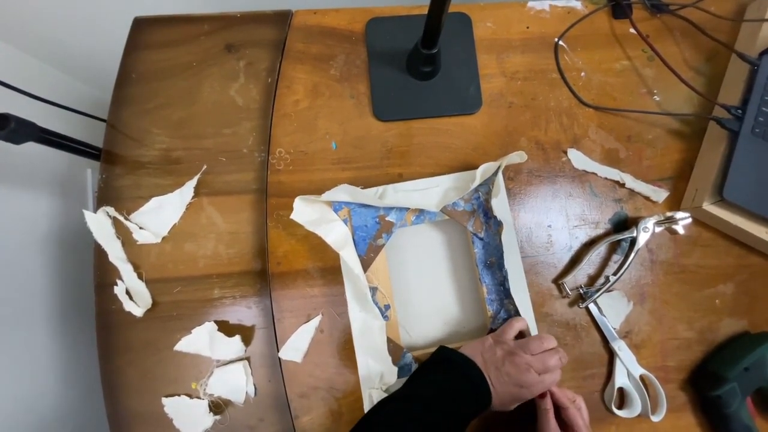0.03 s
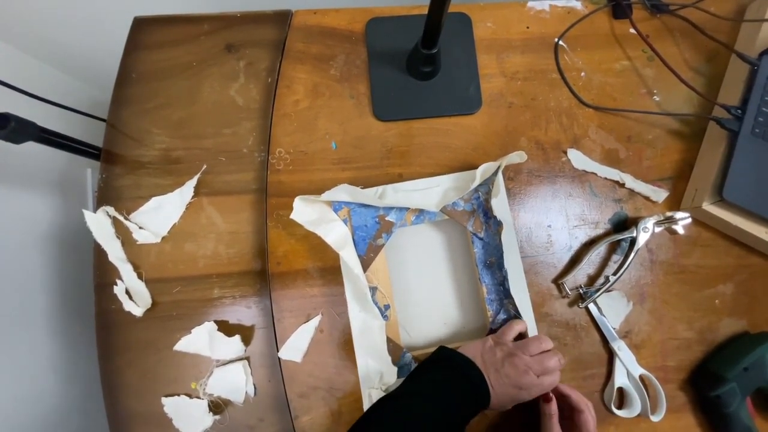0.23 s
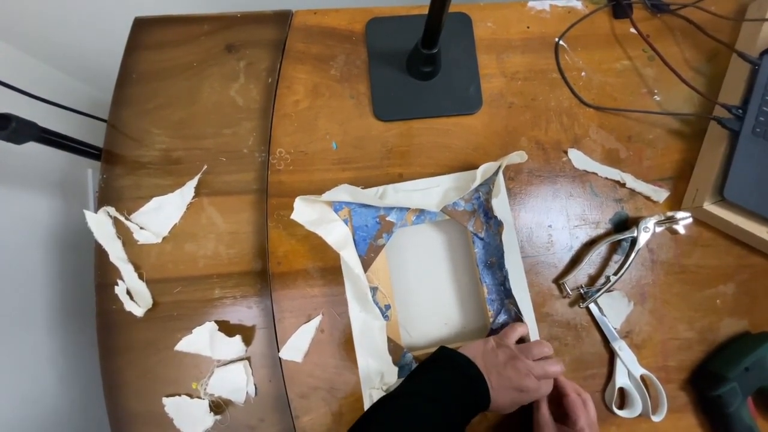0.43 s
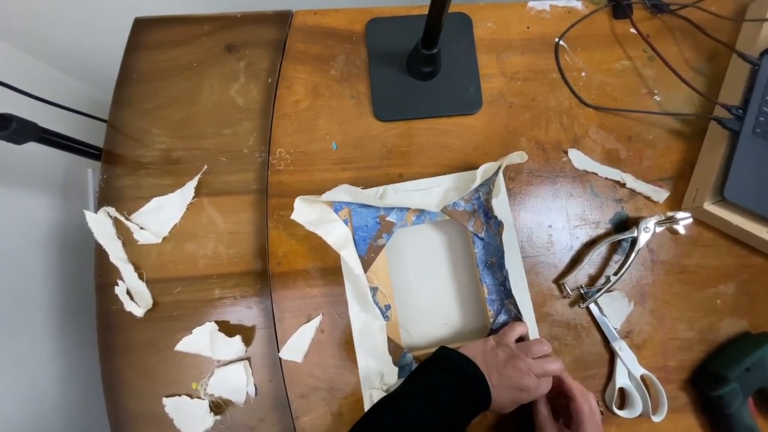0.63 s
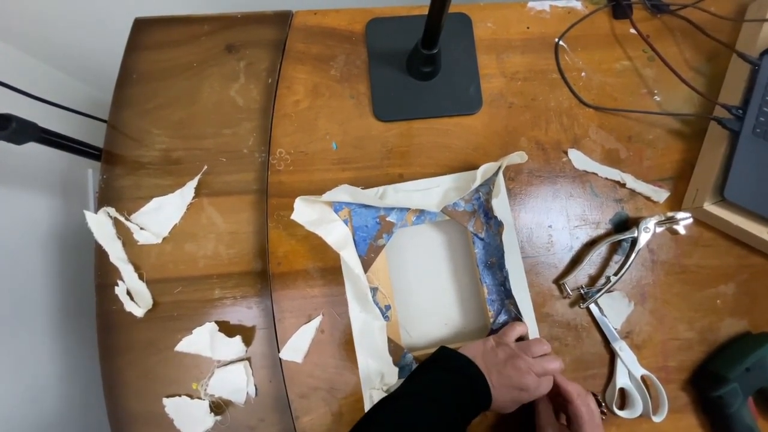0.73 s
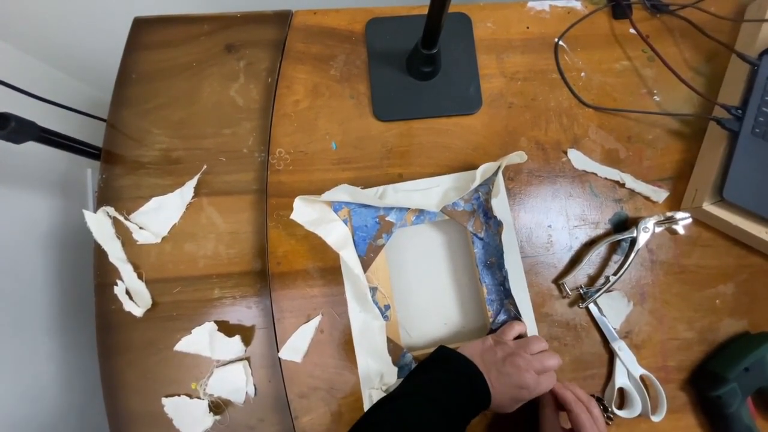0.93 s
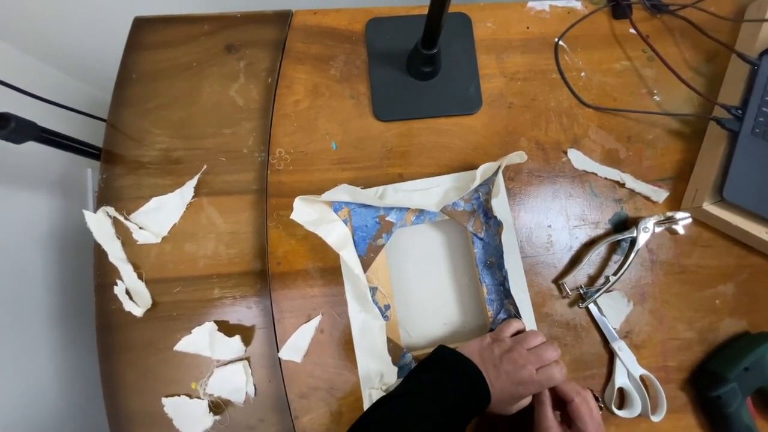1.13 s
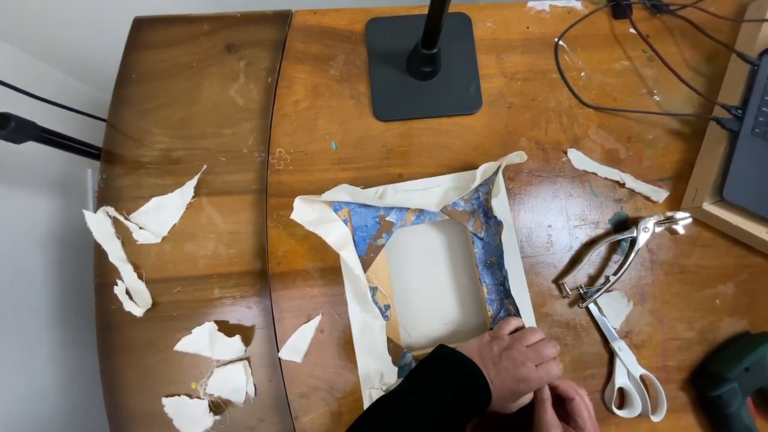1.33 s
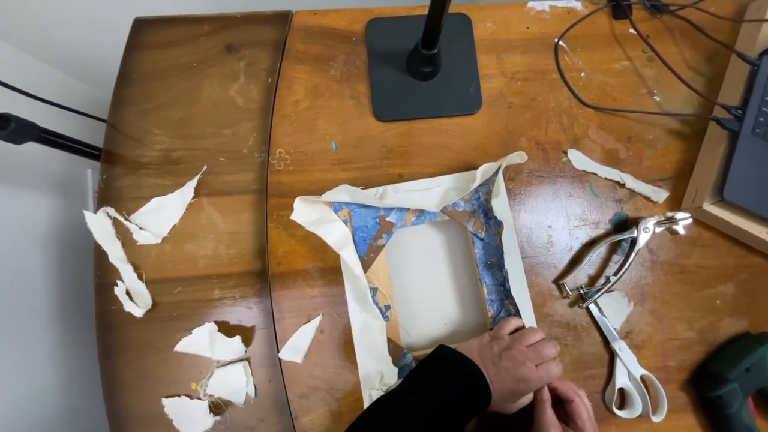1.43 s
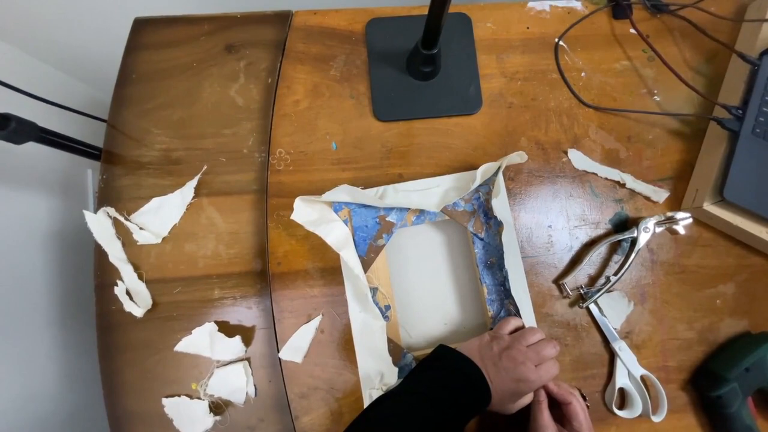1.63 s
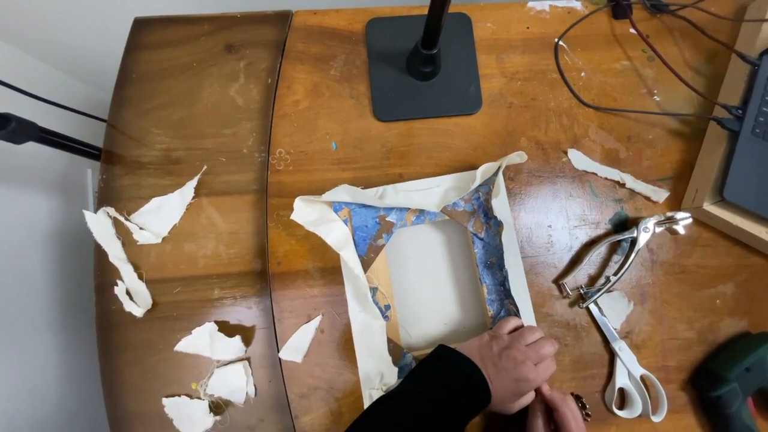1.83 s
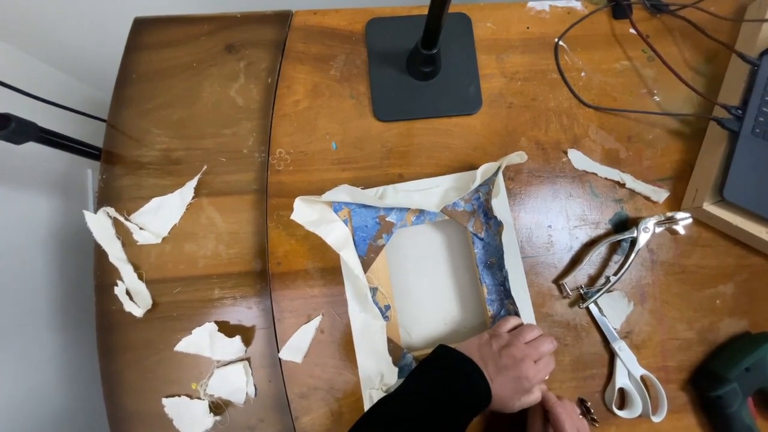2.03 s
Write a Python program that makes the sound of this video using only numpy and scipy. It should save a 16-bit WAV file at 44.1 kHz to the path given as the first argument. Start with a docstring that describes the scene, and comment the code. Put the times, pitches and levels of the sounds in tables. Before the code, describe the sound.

In a quiet room, a tool clacks twice and rattles, then a wooden frame knocks and rocks on a booming tabletop. Faint rasping strokes over canvas and a few dull thuds follow.

```python
"""Two hard clacks, a wooden clatter with a low boom, then soft strokes on cloth in a quiet room.
Hands are working canvas round a small wooden frame. A hard tool clacks and rattles; the frame
drops back and rocks, ringing at each knock, and the wooden table top booms under it.
Fingers rub over the weave in short strokes and nudge the frame with muffled thuds."""
import sys
import numpy as np
from scipy import signal
from scipy.fft import rfft, irfft, next_fast_len
from scipy.io import wavfile
from scipy.ndimage import map_coordinates

SR = 44100
rng = np.random.default_rng(int(sys.argv[2]) if len(sys.argv) > 2 else 0)


def unload_wav(signal):
    """Save mono or channel-first audio to the path in sys.argv[1] as 16-bit WAV at rate SR, clipped to [-1, 1]."""
    wavfile.write(
        sys.argv[1],
        SR,
        np.round(np.clip(np.atleast_2d(signal).T, -1, 1) * 32767).astype(np.int16),
    )


N = 92610  # 2.1 s
# A "fade" is the time a sound takes to drop by 60 dB; "softness" is the time it takes to build up.


def tool():
    """A hard tool clacks twice and rattles; each hit has a body and a bright crack."""
    # hits (time [s], body [dB], crack [dB], crack's treble limit [Hz])
    hits = [(0.2269, -17, -24, 6100), (0.2624, -27, -40, 6000), (0.2715, -25, -22.5, 8950),
            (0.302, -26.5, -53, 6000), (0.3181, -32, -55.5, 6000)]
    # tone of the body (frequency [Hz], level [dB])
    body_tone = [(50, -27.5), (120, -7), (190, -7.5), (270, -3.5), (350, -7), (580, -4), (720, -14),
                 (880, 1), (1050, -6.5), (1270, -3), (1550, -10.5), (2200, -31.5), (4000, -61.5)]
    # tone of the crack (frequency [Hz], level [dB])
    crack_tone = [(900, -9), (2200, -2), (3400, 4), (4000, -1.5), (4700, 1), (6400, -6.5), (7400, -21),
                  (9000, -19), (11000, -31.5), (15000, -43.5)]
    # faint notes that linger in the table or room after a clack (frequency [Hz], level [dB], fade [s])
    lingering = [(646, -12.5, 0.62), (901, -12, 0.87), (957, -5, 0.24), (1175, -13, .3), (1220, 0, 0.58),
                 (1382, -11.5, 0.98), (1396, -10, 0.69)]
    linger_db, body_room_db, crack_room_db = -19, 18.5, 15.5
    out = np.zeros((2, N))
    low, high = click(body_tone), click(crack_tone)
    for s, body_db, crack_db, limit_hz in hits:
        bright = signal.sosfilt(signal.butter(4, limit_hz, fs=SR, output="sos"), high)
        body = amp(body_db) * burst(low, fade_s=.043, soft_s=.0003)
        crack = amp(crack_db) * burst(bright, fade_s=.022, soft_s=.0007)
        add(out, s, body + crack)
        add(out, s, amp(body_db + linger_db) * ring(lingering, soft_s=.004))
        into_room = amp(body_db + body_room_db) * low + amp(crack_db + crack_room_db) * bright
        add(out, s, room(into_room[None]))
    return out


def frame():
    """The wooden frame knocks, ticks and rings on the table; where it lands colours each knock."""
    # knocks (time [s], wood [dB], ring [dB], tick [dB], softness [s], pitch [Hz])
    knocks = [(.435, -30, -38.5, -42.5, 0.00067, 900), (0.441, -18.5, -30.5, -35.5, 0.0015, 343),
              (.448, -27, -43, -54.5, 0.0012, 324), (.472, -19, -27, -52, 0.0013, 1034),
              (.485, -24, -43, -35.5, 0.0047, 283), (.507, -21.5, -29, -64, 0.00099, 630),
              (0.543, -29.5, -47, -69, 0.0011, 645)]
    # notes the frame rings at (frequency [Hz], level [dB], fade [s])
    notes = [(298.5, -3, .3), (319.7, -8.5, .3), (418.3, -12.5, 0.38), (478, -11, 0.3), (572.8, 2, 0.2),
             (649, -11, 0.19), (686, 2.5, 0.084), (747, -4.5, 0.2), (970, -21, 0.28), (1170, -12.5, 0.14)]
    # tone of knocked wood (frequency [Hz], level [dB])
    wood_tone = [(25, -36.5), (70, -23.5), (150, 11.5), (230, 0.5), (400, 10.5), (700, -0.5), (1000, -2),
                 (1280, -5.5), (1600, -8), (2200, -28.5), (4000, -25.5), (9000, -39.5)]
    # tone of the sharp tick (frequency [Hz], level [dB])
    tick_tone = [(100, -36.5), (600, 14), (1600, -13.5), (2200, 7.5), (3500, -2.5), (6000, -3), (8800, -6),
                 (10000, -22), (15000, -31.5)]
    # colour from the landing spot (frequency [times the pitch], level [dB])
    spot_tone = [(.35, -15), (.7, 0), (1, -1.5), (1.3, -3.5), (2, -9)]
    knock_room_db, tick_room_db = -11.5, -7
    out = np.zeros((2, N))
    tick_click = click(tick_tone)
    hz = np.geomspace(25, SR / 2, 100)
    for s, wood_db, ring_db, tick_db, soft_s, pitch_hz in knocks:
        tone_db = along(wood_tone, hz) + along(tuned(spot_tone, pitch_hz), hz)
        wood_click = click(np.column_stack([hz, tone_db]))
        knock = amp(wood_db) * burst(wood_click, fade_s=.045, soft_s=soft_s)
        tick = amp(tick_db) * burst(tick_click, fade_s=.044, soft_s=soft_s)
        add(out, s, knock + tick)
        add(out, s, room(amp(knock_room_db) * knock + amp(tick_room_db) * tick))
        add(out, s, amp(ring_db) * ring(notes, soft_s))
    return out


def table():
    """Each shove makes the table top sway deeply and boom like a drum."""
    # shoves (time [s], sway [dB], drum [dB])
    shoves = [(.003, -46, -46.5), (0.136, -74.5, -54.5), (0.174, -48, -56.5), (.215, -57.5, -37),
              (0.26, -50.5, -29.5), (0.4424, -28, -19.5), (0.4918, -27, -25.5), (0.598, -48, -33.5),
              (0.828, -49.5, -35), (.882, -58, -38.5), (.935, -57.5, -40.5), (1.211, -54.5, -50.5),
              (1.258, -65.5, -48.5), (1.402, -53.5, -54.5), (1.445, -44.5, -37), (1.558, -67, -49.5),
              (1.621, -64.5, -46.5), (1.837, -78.5, -44.5), (2.029, -43, -31)]
    # notes of the sway (frequency [Hz], level [dB], fade [s])
    sway_notes = [(58.4, 7.5, 0.2), (78.4, -8, 0.46)]
    # notes of the drumming (frequency [Hz], level [dB], fade [s])
    drum_notes = [(95, -4, 0.18), (125.16, 0, .36)]
    low_cut_hz = 44.3
    sway, drum = ring(sway_notes, soft_s=.005), ring(drum_notes, soft_s=.0018)
    out = np.zeros(N)
    for s, sway_db, drum_db in shoves:
        add(out, s, amp(sway_db) * sway + amp(drum_db) * drum)
    return signal.sosfilt(signal.butter(4, low_cut_hz, "high", fs=SR, output="sos"), out)


def fingers():
    """Fingers bump the cloth-covered frame: muffled thuds, each with a brief note."""
    # bumps (time [s], level [dB], softness [s], pitch [Hz])
    bumps = [(.003, -32.5, 0.0015, 192), (.007, -36, 0.001, 490), (0.049, -46.5, 0.0036, 462),
             (0.171, -35, 0.0033, 200), (.176, -40, 0.0042, 440), (.884, -59.5, 0.004, 370),
             (1.438, -47, 0.0026, 326), (1.574, -41.5, 0.0015, 423), (1.577, -42.5, 0.0033, 196),
             (1.623, -48.5, 0.00079, 219), (1.827, -57, 0.0027, 274), (1.851, -43, 0.0018, 467),
             (2.027, -43.5, .002, 219), (2.028, -46.5, 0.0038, 725), (2.070, -40, 0.0028, 221),
             (2.075, -59, .004, 790)]
    # tone of a thud (frequency [times the pitch], level [dB])
    thud_tone = [(.06, -39), (.25, -17.5), (.55, -10.5), (.85, 1), (1, 1), (1.2, -6), (1.7, -11),
                 (2.6, -24.5), (5, -33.5), (15, -59), (30, -84)]
    note_db, note_fade_s, room_db = 2, .06, -3.5
    out = np.zeros((2, N))
    for s, db, soft_s, pitch_hz in bumps:
        thud = amp(db) * burst(click(tuned(thud_tone, pitch_hz)), fade_s=.045, soft_s=soft_s)
        add(out, s, thud)
        add(out, s, amp(db) * ring([(pitch_hz, note_db, note_fade_s)], soft_s))
        add(out, s, amp(room_db) * room(thud))
    return out


def cloth():
    """Strokes over the canvas swell and die away, grainy and rasping from the weave."""
    # strokes (peak time [s], 20 dB rise [s], 20 dB fall [s],
    # drag [dB], rub [dB], rasp [dB], hiss [dB], rub pitch [Hz])
    strokes = [(.015, 0.15, 0.1, -45, -59.5, -63.5, -55, 1620),
               (.18, .12, .13, -46.5, -56, -64.5, -58.5, 1490),
               (0.786, 0.06, 0.082, -56, -59, -70, -108, 900),
               (0.869, 0.13, .16, -52, -56, -63, -63.5, 1590),
               (1.249, 0.11, 0.06, -63, -82, -73, -84, 1500),
               (1.566, .13, .10, -52.5, -56, -71, -71.5, 1620),
               (1.853, 0.077, 0.065, -51, -64, -60.5, -68, 1470),
               (1.895, 0.051, 0.048, -71, -65.5, -60, -60.5, 2440)]
    # tone of the low drag (frequency [Hz], level [dB])
    drag_tone = [(25, -35), (90, -13), (190, 2.5), (300, -4), (460, 0.5), (700, -11.5), (1100, -20.5),
                 (2000, -39), (5000, -78.5)]
    # tone of the rub (frequency [times the pitch], level [dB])
    rub_tone = [(.08, -51), (.3, -25), (.62, -6.5), (.82, 3), (1, 6), (1.2, -1), (1.5, -9.5), (2, -12.5),
                (2.65, -10), (3.2, -30), (5, -36), (8, -76)]
    # tone of the weave's rasp (frequency [Hz], level [dB])
    rasp_tone = [(600, -64.5), (1100, -31), (1330, -21.5), (1395, 2.5), (1470, -1.5), (1620, -2.5),
                 (1800, -27.5), (2250, -12), (2500, 0), (2660, -7), (2810, 1), (2960, -24.5), (3600, -26.5),
                 (7000, -71)]
    # tone of the high hiss (frequency [Hz], level [dB])
    hiss_tone = [(300, -49.5), (1500, -16), (3000, 4), (4700, 0), (6500, -0.5), (8700, -1.5), (9500, 0),
                 (10200, -38), (12000, -50)]
    grain_hz, grain_db = 346, .5  # a slight, fast flicker in loudness
    t, out = np.arange(N) / SR, np.zeros((2, N))
    flicker = map_coordinates(rng.standard_normal(N // 8), [t * grain_hz])
    drag, rasp, hiss = noise(drag_tone), noise(rasp_tone), noise(hiss_tone)
    for s, rise, fall, drag_db, rub_db, rasp_db, hiss_db, pitch_hz in strokes:
        from_peak = np.maximum((s - t) / rise, (t - s) / fall)
        swell = amp(-20 * from_peak ** 1.56)
        rub = noise(tuned(rub_tone, pitch_hz))
        friction = amp(drag_db) * drag + amp(rub_db) * rub + amp(rasp_db) * rasp + amp(hiss_db) * hiss
        out += swell * friction
    return out * unit(amp(grain_db * flicker))


def room(x):
    """The room answers a blow with a short wash of echoes."""
    # how long the echoes last (frequency [Hz], fade [s])
    fades = [(60, .35), (300, 0.52), (650, 0.34), (1100, 0.46), (4000, 0.37), (9000, 0.37)]
    soft_s = .003
    hz, t, bands = signal.stft(rng.standard_normal((2, SR // 2)), SR, nperseg=256)
    dying = amp(-60 * t / along(fades, hz)[:, None])
    building = 1 - np.exp(-t / soft_s)
    tail = signal.istft(bands * dying * building, SR, nperseg=256)[1]
    tail /= np.linalg.norm(tail[0])
    return spread(signal.fftconvolve(x.mean(0)[None], tail, axes=1))


def background():
    """Steady room rumble and microphone hiss."""
    # tone of the quiet room (frequency [Hz], level [dB])
    quiet_tone = [(15, -28.5), (30, -14.5), (41, 2), (56, -2.5), (86, -14), (125, -6), (170, -13),
                  (300, -18.5), (450, -17.5), (700, -22.5), (1050, -33), (1400, -26.5), (2000, -33.5),
                  (3300, -33.5), (4500, -40.5), (5300, -47), (8600, -37.5), (9300, -41.5), (10500, -64.5),
                  (13000, -61), (15000, -58.5)]
    return amp(db=-59) * noise(quiet_tone)


def burst(colour, fade_s, soft_s):
    """One contact: quickly dying chatter that takes on the tone of the click `colour`."""
    t = np.arange(SR // 8) / SR
    chatter = np.sign(rng.standard_normal((2, len(t))))
    dying = amp(-60 * np.maximum(t - soft_s, 0) / fade_s)
    building = np.minimum(t / soft_s, 1)
    return spread(signal.fftconvolve(chatter * dying * building, colour[None], axes=1))


def ring(notes, soft_s):
    """Pure notes that start softly and die away."""
    t = np.arange(SR * 3 // 4) / SR
    ringing = sum(amp(db - 60 * t / fade_s) * np.sin(2 * np.pi * hz * t) for hz, db, fade_s in notes)
    return ringing * (1 - np.exp(-t / soft_s))


def click(tone, size=2048):
    """A single click with the given tone and an energy of 1."""
    gain = amp(along(tone, np.fft.rfftfreq(size, 1 / SR)))
    cepstrum = irfft(np.log(gain + 1e-6))
    # folding this onto its first half packs the energy at the click's start
    cepstrum[1:size // 2] *= 2
    cepstrum[size // 2 + 1:] = 0
    pulse = irfft(np.exp(rfft(cepstrum)))
    return pulse / np.linalg.norm(pulse)


def noise(tone):
    """Steady stereo noise with the given tone."""
    white = rng.standard_normal((2, N))
    return unit(spread(filtered(white, lambda hz: amp(along(tone, hz)))))


def spread(pair):
    """Turn two unrelated signals into left and right: bass narrow, treble wide."""
    # stereo width (frequency [Hz], sides over middle [dB])
    width = [(40, -18.5), (130, -15.5), (500, -12.5), (1100, -8), (2200, -1), (4200, -4), (8000, -11)]
    side = filtered(pair[1], lambda hz: amp(along(width, hz)))[:pair.shape[1]]
    return np.array([pair[0] + side, pair[0] - side])


def filtered(x, gain_at):
    """Turn each frequency of x up or down by gain_at(hz)."""
    size = next_fast_len(N + SR // 2)
    hz = np.fft.rfftfreq(size, 1 / SR)
    return irfft(rfft(x, size) * gain_at(hz), size)[..., :N]


def tuned(tone, pitch_hz):
    """Turn multiples of a pitch into Hz."""
    return [(multiple * pitch_hz, db) for multiple, db in tone]


def along(points, hz):
    """Read between (frequency, value) points, with octaves about evenly spaced."""
    point_hz, values = np.transpose(points)
    return np.interp(np.log(hz + 1), np.log(point_hz + 1), values)


def add(out, s, x):
    """Mix x into out, starting at s seconds."""
    start = max(0, round(s * SR))
    out[..., start:start + x.shape[-1]] += x[..., :max(0, N - start)]


def amp(db):
    """Turn decibels into a multiplier."""
    return 10 ** (np.asarray(db) / 20)


def unit(x):
    """Scale x to an average (rms) level of 1."""
    return x / np.sqrt(np.mean(x ** 2) + 1e-20)


def scene():
    """All the sounds together, with the low notes leaning left."""
    # balance (frequency [Hz], left over right [dB])
    balance = [(30, -36.5), (60, 10), (130, 1.5), (300, 2), (600, 4.5), (1200, 2.5), (2500, -0.5),
               (8000, 0.5)]
    sound = tool() + frame() + fingers() + table() + cloth() + background()
    return filtered(sound, lambda hz: amp(np.outer([.5, -.5], along(balance, hz))))


def record(dry):
    """The recorder dulls the top treble and keeps nothing above its upper limit."""
    dull_hz, dull_db, slope_width_hz, limit_hz = 9200, -15.5, 400, 15400

    def gain_at(hz):
        dullness = np.clip((hz - dull_hz) / slope_width_hz + .5, 0, 1)
        return amp(dull_db * dullness) * (hz < limit_hz)

    return filtered(dry, gain_at)


dry = scene()
out = record(dry)
unload_wav(out)
```